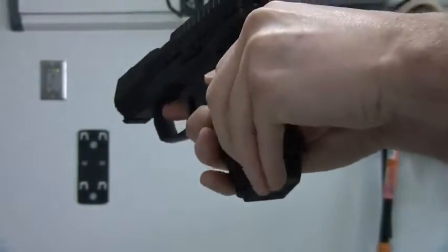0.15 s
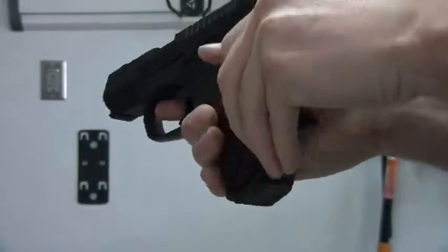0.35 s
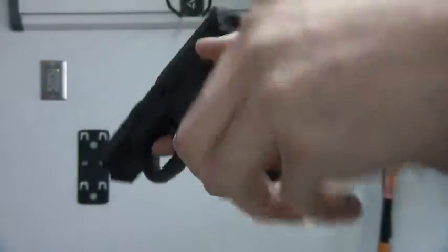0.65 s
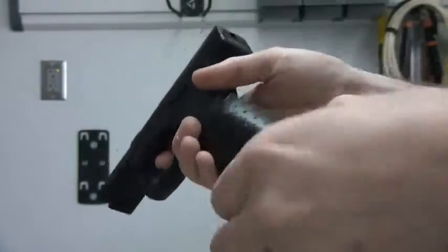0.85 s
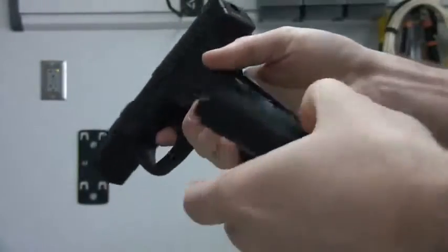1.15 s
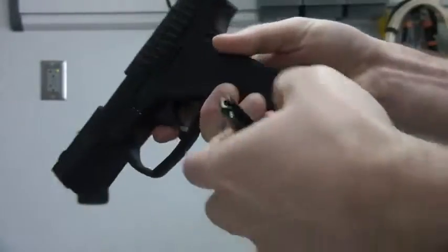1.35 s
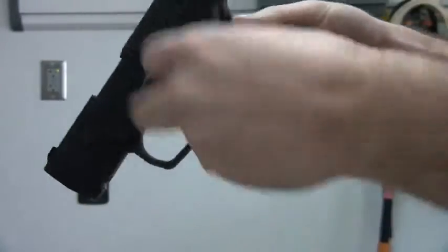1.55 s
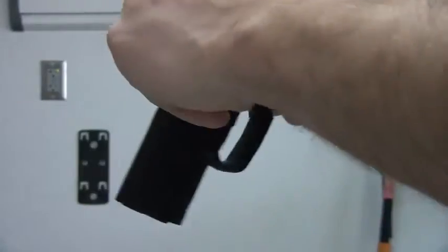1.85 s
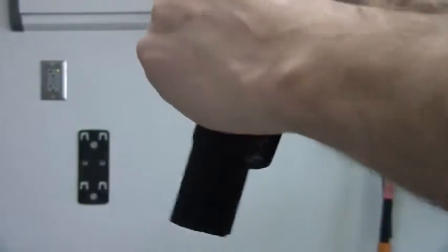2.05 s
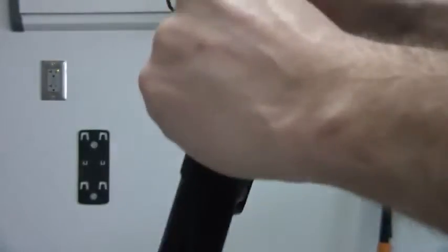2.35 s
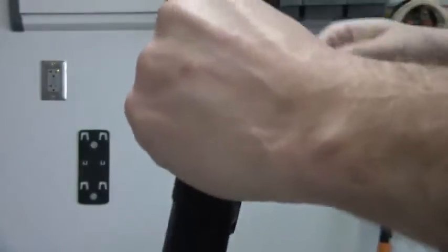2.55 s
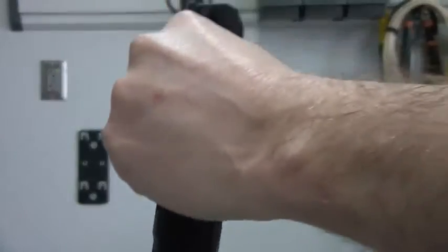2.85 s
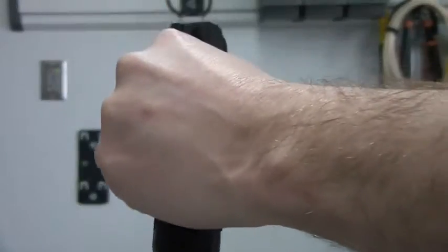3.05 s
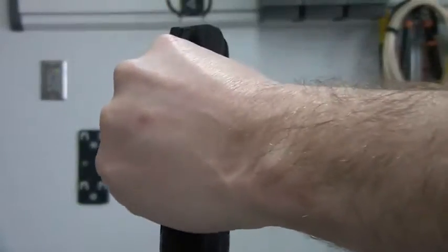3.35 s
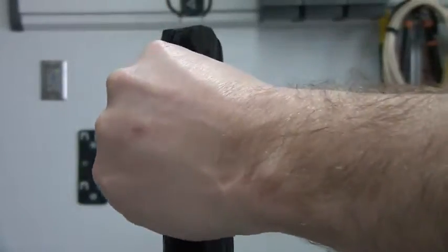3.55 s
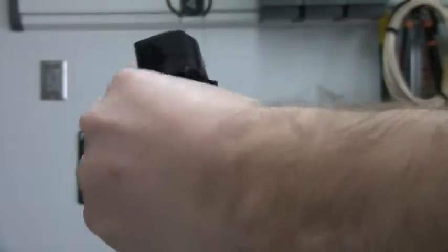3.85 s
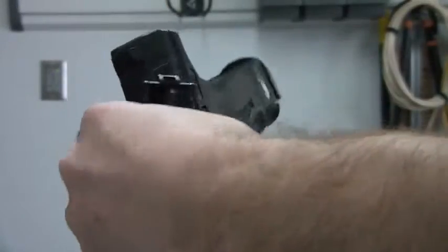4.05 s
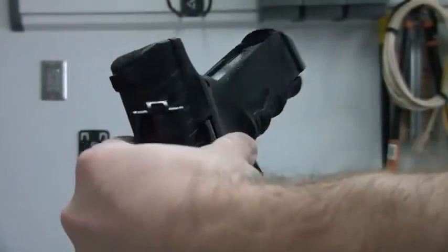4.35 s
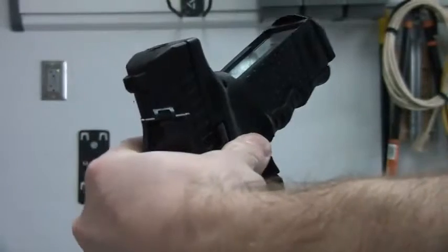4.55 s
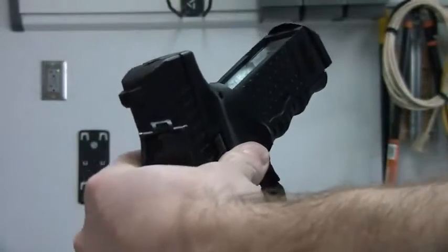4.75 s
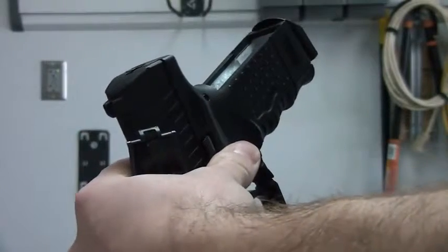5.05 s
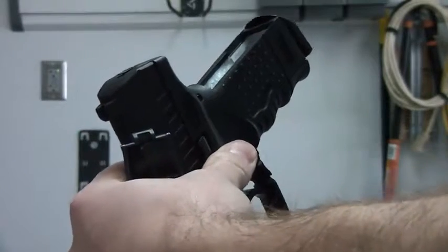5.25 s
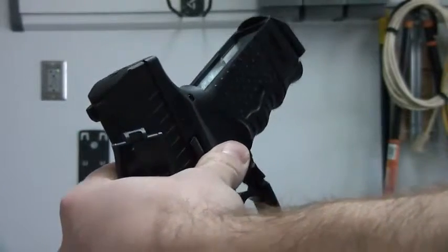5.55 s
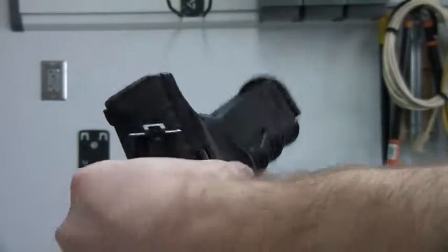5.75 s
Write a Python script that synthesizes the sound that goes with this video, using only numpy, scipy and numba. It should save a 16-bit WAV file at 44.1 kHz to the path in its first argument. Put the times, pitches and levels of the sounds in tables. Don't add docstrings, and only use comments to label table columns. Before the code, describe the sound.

An air pistol cracks once close by, clicks, and its leaking gas hisses and whistles, growing louder and brighter while hands knock the grip.

```python
import sys
import numpy as np
from scipy import signal
from scipy.fft import rfft, irfft
from scipy.io import wavfile
from scipy.ndimage import uniform_filter1d
from numba import njit

SR = 44100
rng = np.random.default_rng(int(sys.argv[2]) if len(sys.argv) > 2 else 0)


def file_out(sig):
    cols = np.atleast_2d(sig).T
    lim = np.clip(cols, -1, 1)
    pcm = np.round(lim * 32767).astype(np.int16)
    wavfile.write(sys.argv[1], SR, pcm)


def nominal_scale(level):
    x = np.asarray(level, float) / 20
    return 10 ** x


N = 260631
TIME = np.arange(N) / SR
HZ = np.maximum(np.arange(N // 2 + 1) * SR / N, 1)


def level(x, db):
    return x * nominal_scale(db) / np.sqrt(np.mean(x ** 2))


def shape(points):
    hz, db = np.transpose(points)
    return nominal_scale(np.interp(np.log(HZ), np.log(hz), db))


def colour(x, gain):
    return irfft(rfft(x) * gain, N)


def walk(rate):
    hold = int(SR / rate)
    steps = np.repeat(rng.standard_normal(N // hold + 1), hold)
    return 0.91 * uniform_filter1d(uniform_filter1d(steps, hold), hold)[:N]


def ring(x, modes):
    out = 0
    for k, (hz, width, db) in enumerate(modes):
        pole = np.exp((2j * np.pi * hz - np.pi * width) / SR)
        sign = (-1) ** k
        out = out + sign * nominal_scale(db) * signal.lfilter([1], [1, -pole], x).imag
    return out


def blows(rows, push_s):
    x = np.zeros(N)
    for s, db in rows:
        x[int(s * SR)] = nominal_scale(db)
    t = np.arange(64) / SR
    push = t * np.exp(-t / push_s)
    return signal.lfilter(push / push.sum(), 1, x)


@njit
def svf(x, hz, width):
    y, band, low = np.empty(len(x)), 0., 0.
    for i in range(len(x)):
        g = np.tan(np.pi * hz[i] / SR)
        k = width / hz[i]
        v = (band + g * (x[i] - low)) / (1 + g * (g + k))
        band = 2 * v - band
        low = low + 2 * g * v
        y[i] = k * v
    return y


def resonance(hz, width):
    centre = hz * (1 + 0.013 * walk(25))
    tone = [svf(svf(n, centre, width), centre, width) for n in rng.standard_normal((2, N))]
    return level(np.array(tone), 0) * nominal_scale(1.6 * walk(30))


def whistle(rows, width):
    s, hz, db = np.transpose(rows)
    fade = np.clip(np.minimum(TIME - s[0], s[-1] - TIME) / 0.025, 0, 1)
    return resonance(np.interp(TIME, s, hz), width) * nominal_scale(np.interp(TIME, s, db)) * fade


def facing():
    # start_s, level_db
    opening = [(0, -47.5), (.2, -42.5), (.45, -35.5), (1.2, -35), (1.85, -37), (2.07, -34), (2.16, -30),
               (2.35, -27.5), (3.0, -25.5), (3.1, -32), (3.22, -35), (3.6, -36.5), (3.7, -29.5),
               (3.93, -28), (4.08, -24.5), (4.6, -23), (5.5, -23), (5.91, -23.5)]
    unshaded_db = -24
    cavity_db = np.interp(TIME, *np.transpose(opening))
    return cavity_db, unshaded_db - cavity_db


def fingers():
    # start_s, share (0-1)
    escape = [
        (.35, 0.54),
        (.6, .5),
        (.9, 1),
        (1.3, 1),
        (1.7, 0.76),
        (1.8, 0.24),
        (2.1, 0.33),
    ]
    return np.interp(TIME, *np.transpose(escape))


def jet():
    # pitch_hz, level_db (per Hz)
    spectrum = [(500, -16), (1050, -13.5), (1400, -3.5), (2000, -2.5), (2900, -10.5), (3600, -12),
                (5100, -14), (5700, -18.5), (7000, -17), (8200, -12), (10000, -12), (10800, -13),
                (15500, -10)]
    # pitch_hz, width_hz, lift_db
    cavity = [(2110, 140, 1.5), (4185, 1850, 9.5), (4810, 710, 0), (8700, 1600, 5.5), (13200, 910, 0)]
    # from_hz, to_hz
    bands = [
        (600, 2900, 1200, 2700),
        (2900, 6200, 3300, 5300),
        (6200, 10300, 7300, 10000),
        (10300, 17000, 10500, 15000),
    ]
    # level_db (against the cavity), kept_db (per dB of shade), finger_db (added by the fingers)
    shading = [
        (-7.5, -0.1029, 0),
        (-1, 0, 1),
        (-8.5, 0.38, 4),
        (-8, 0.05, -2),
    ]
    cavity_db, shade_db = facing()
    gain = shape(spectrum)
    for hz, width, db in cavity:
        gain = gain * nominal_scale(db / (1 + (2 * (HZ - hz) / width) ** 2))
    gust_db = .25 * walk(9) + 1.2 * walk(150)
    noise = rng.standard_normal((2, N)) * nominal_scale(gust_db)
    out = 0
    for (low, high, a, b), (rel_db, kept, finger_db) in zip(bands, shading):
        band = gain * ((1 + (low / HZ) ** 12) * (1 + (HZ / high) ** 12)) ** -.5
        band = band / np.sqrt(np.mean((gain * (HZ > a) * (HZ < b)) ** 2))
        band_db = cavity_db + rel_db + kept * shade_db + finger_db * fingers() + .5 * walk(15)
        out = out + colour(noise, band) * nominal_scale(band_db)
    return out


def palm_echo(x):
    lag_ms, cupped_ms, share = 0.17, 0.16, 0.1
    late = TIME - (lag_ms + cupped_ms * fingers()) / 1000
    return np.array([(c + share * np.interp(late, TIME, c)) / np.sqrt(1 + share ** 2) for c in x])


def ridge():
    ridges = [(4060, 25, 490, -1, 1), (4844, 23.5, 420, -5, 0.35), (9470, 51, 1200, -8, 2.6),
              (2080, 4, 220, -15, 0)]
    drift, swell_db = .015, 1.2
    cavity_db, shade_db = facing()
    out = 0
    for hz, sag, width, db, loss in ridges:
        centre = (hz - sag * shade_db) * (1 + drift * walk(2.96))
        tone = resonance(centre, width)
        out = out + tone * nominal_scale(cavity_db + db - loss * shade_db + swell_db * walk(2.87))
    return out


def seal():
    # start_s, pitch_hz, level_db
    edge = [
        (.36, 8800, -37),
        (.55, 8350, -36.5),
        (.7, 8500, -29),
        (.87, 8400, -28),
        (1.05, 8700, -25),
        (1.2, 8760, -28.5),
        (1.3, 9050, -31),
    ]
    # start_s, length_s, first_hz, last_hz, peak_db
    glides = [
        (1.02, .65, 7400, 8450, -31.5),
        (1.46, 0.74, 7400, 8600, -36.5),
        (1.57, 0.59, 8800, 9200, -35),
        (-.2, 0.56, 12750, 13200, -48),
        (1.15, .65, 11800, 10000, -46),
        (.5, .75, 12300, 12400, -51),
        (1.0, 1.6, 14900, 15000, -47),
        (0.42, 1.04, 4400, 4850, -40),
        (0.36, 0.46, 3480, 3620, -35.5),
        (-.25, .7, 3750, 3540, -43),
    ]
    glide_width, glide_ends_db = 0.092, 3
    spill = resonance(5430 + 0 * TIME, 8100) * nominal_scale(-35) * fingers()
    out = whistle(edge, 1000.0) + spill
    for s, length, first, last, db in glides:
        part = np.clip((TIME - s) / length, 0, 1)
        arch = np.sqrt(np.clip(np.sin(np.pi * part), 0, 1))
        swell = nominal_scale(db - glide_ends_db * (2 * part - 1) ** 2) * arch
        out = out + resonance(first + (last - first) * part, glide_width * first) * swell
    return out


def pistol():
    # start_s, peak_db
    slaps = [
        (.2058, 7),
        (.2092, -27),
        (.2205, -23),
        (.2270, -13),
        (.2412, -17),
        (.2485, -5),
    ]
    # start_s, peak_db
    clicks = [
        (.4513, -11),
        (.4546, -11),
        (.4573, -11.5),
    ]
    # start_s, peak_db
    knocks = [(1.42, -44), (3.32, -36), (4.075, -22.5), (4.485, -27), (4.59, -29), (2.26, -34), (3.95, -35),
              (4.72, -35.5)]
    # pitch_hz, width_hz, level_db
    barrel = [(306, 150, -43), (750, 98, -31.5), (1142, 155, -4.5), (1458, 120, -1), (2280, 230, -2.5),
              (4000, 660, -3), (5330, 400, -22)]
    # pitch_hz, width_hz, level_db
    blast = [(3750, 710, -3.5), (6700, 2200, -3.5)]
    # pitch_hz, width_hz, level_db
    body = [(594, 470, -12.5), (1410, 250, 2), (1870, 610, 0)]
    # pitch_hz, width_hz, level_db
    spring = [(3690, 210, 3), (5470, 680, 1), (10400, 2400, 5.5)]
    # pitch_hz, width_hz, level_db
    skin = [(477, 110, -3), (1000, 230, 3)]
    crack_db, crack_t60_s, front = -14, .009, 4
    rattle_s, rattle_rise_s, rattle_t60_s, rattle_db = .457, .035, .07, -35

    since = np.clip(TIME - slaps[0][0], 0, 1)
    puff = rng.standard_normal(N) * (since > 0) * nominal_scale(-60 * since / crack_t60_s)
    crack = ring(puff + front * blows(slaps[:1], .00001), [(8000, 6500, crack_db)])
    shot = ring(blows(slaps, .00005), barrel)

    late = TIME - rattle_s
    near = np.abs(late) < .1
    fall_db = -60 * np.maximum(late / rattle_t60_s, -late / rattle_rise_s)
    grit = rng.standard_normal(N) * nominal_scale(rattle_db + fall_db * near + 1.3 * walk(510)) * near
    small = ring(blows(clicks, .00005), body) + ring(grit, spring) + ring(blows(knocks, 0.00025), skin)

    direct = np.array([[1], [.3]]) * (shot + crack + small)
    room_blast = ring(blows(slaps[:1], .00001), blast)
    return direct + walls(shot * nominal_scale(-5.0) + room_blast + small * nominal_scale(-6.5), 0.0022)


def walls(x, gap_s):
    # pitch_hz, t60_s
    decay = [(250, 0.3), (1200, 0.76), (2500, 0.66), (5000, 0.54), (10000, 0.19)]
    tail, noise = 0, rng.standard_normal((2, N))
    hz, t60 = np.transpose(decay)
    for k in range(len(hz)):
        share = np.interp(np.log(HZ), np.log(hz), np.arange(len(hz)) == k)
        tail = tail + colour(noise, share) * nominal_scale(-60 * TIME / t60[k])
    tail = (tail * np.clip(TIME / gap_s, 0, 1))[:, :SR]
    tail = tail / np.sqrt(np.mean(tail ** 2) * SR)
    return signal.fftconvolve(np.atleast_2d(x), tail, axes=1)[:, :N]


def earlier_shot():
    # pitch_hz, width_hz, level_db
    remains = [(1086, 102, -4), (1400, 290, -0.5), (1600, 210, -4.5), (2080, 310, -8), (3700, 540, -9.5)]
    tail = level(ring(rng.standard_normal((2, N)), remains), -23.5)
    return tail * nominal_scale(-70 * TIME + 1.1 * walk(77))


def camera():
    # start_s, peak_db
    creaks = [(1.43, -36), (2.26, -41), (2.55, -41), (3.33, -37), (3.94, -40), (4.06, -39), (4.49, -38),
              (4.585, -33), (4.60, -35), (4.72, -37)]
    # pitch_hz, width_hz, level_db
    shell = [(960, 90, 0), (1180, 140, -1)]
    ticks_per_s, tick_db, scatter_db = 9, -49, 2
    chance = rng.random((int(ticks_per_s * N / SR), 2))
    ticks = [(a * (N - 1) / SR, tick_db - scatter_db * np.log(b + .1)) for a, b in chance]
    hiss = level(ring(rng.standard_normal(N), [(1010, 350, 0)]), -61)
    return hiss + ring(blows(ticks + creaks, .0001), shell)


def garage():
    # pitch_hz, level_db (per Hz)
    hum = [(12, -36), (20, 1), (43, 4), (70, -6), (123, -0.5), (300, -7.5), (374, -12), (452, -10.5),
           (574, -16), (1200, -22), (1560, -95), (2640, -120)]
    # pitch_hz, width_hz, level_db
    motors = [(27.7, 8.5, -53), (58.3, 7.1, -57.5), (106.8, 8, -51.5)]
    # start_s, pitch_hz, level_db
    surge = [
        (.45, 108, -52),
        (.7, 110, -50),
        (.95, 110, -52),
    ]
    rumble = level(colour(rng.standard_normal((2, N)), shape(hum)), -44)
    out = rumble * nominal_scale(1.0 * walk(5.35)) + whistle(surge, 25.)
    for hz, width, db in motors:
        out = out + level(ring(rng.standard_normal((2, N)), [(hz, width, 0)]), db)
    return out


def scene():
    # pitch_hz, level_db
    ports = [(60, -20), (200, -20), (380, -13), (700, -17), (1290, -15.5), (2380, -31.5), (3500, -15.5),
             (5000, -9), (7000, 2), (9000, -8), (11500, -4), (15000, -2)]
    # start_s, pan_db (left minus right)
    turn = [
        (0.0, 1.5),
        (0.26, 1.5),
        (0.87, -1.5),
        (1.97, -1.5),
        (2.14, 0.0),
        (5.91, -1),
    ]
    seal_spread, garage_pan_db = .6, -0.1
    gas = palm_echo(jet()) + ridge() + seal() * np.array([[1], [seal_spread]])
    gas = nominal_scale(-3.0) * gas + nominal_scale(-13.0) * walls(gas, 0.0058)
    mid, partner = gas + pistol() + earlier_shot()
    (hum, hum_partner), shell = garage(), camera()
    side = colour(partner + hum_partner, shape(ports))
    side = side + hum * (nominal_scale(garage_pan_db / 2) - 1) + shell
    mid = mid + hum + .7 * shell
    pan_db = np.interp(TIME, *np.transpose(turn))
    return np.array([nominal_scale(pan_db / 2) * (mid + side), nominal_scale(-pan_db / 2) * (mid - side)])


def top_cut(x):
    return signal.sosfilt(signal.butter(12, 16530, fs=SR, output="sos"), x)


def record(dry):
    top_hz = 15300
    flattened = np.clip(dry, -1, 1)
    return top_cut(colour(flattened, 1. * (HZ < top_hz)))


dry = scene()
out = record(dry)
file_out(out)
```